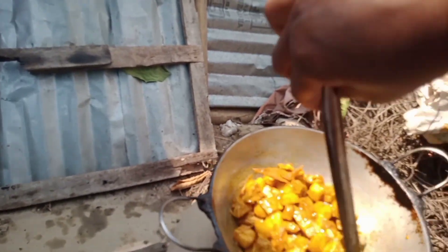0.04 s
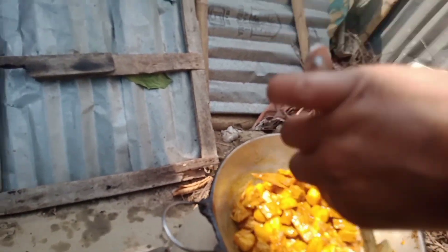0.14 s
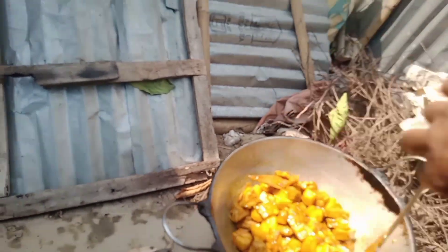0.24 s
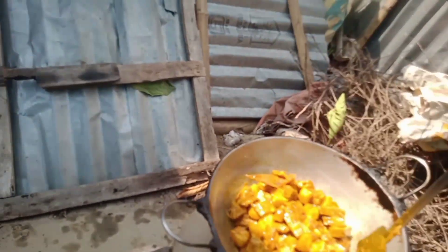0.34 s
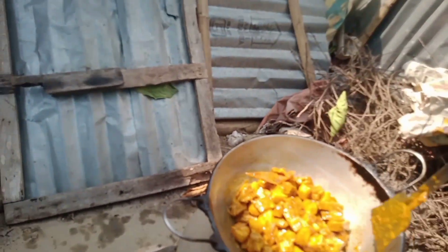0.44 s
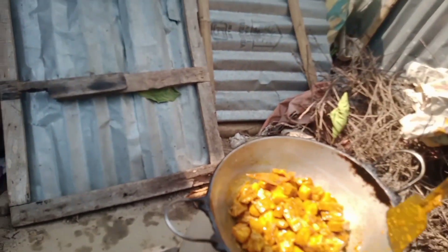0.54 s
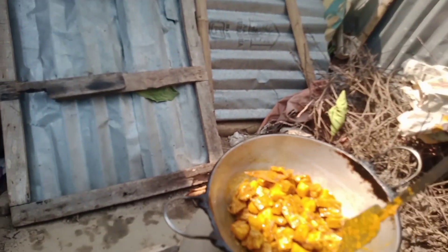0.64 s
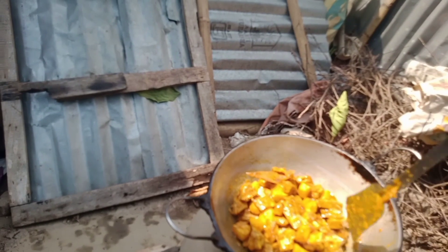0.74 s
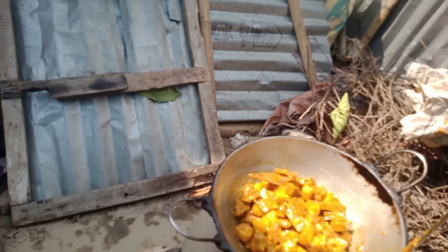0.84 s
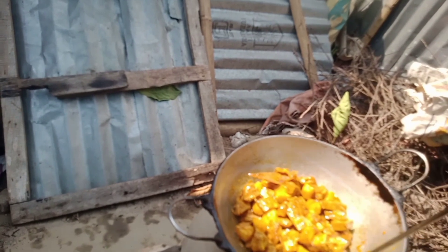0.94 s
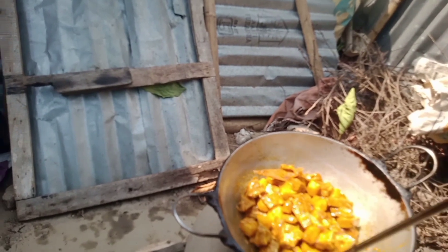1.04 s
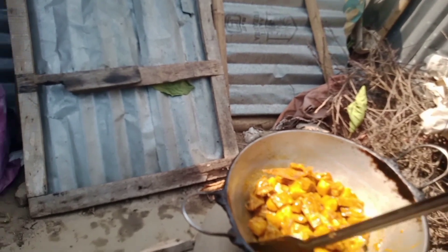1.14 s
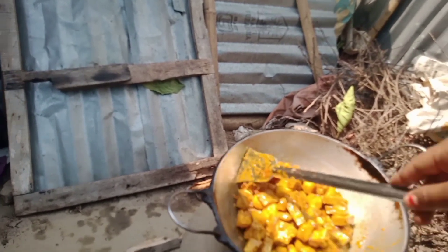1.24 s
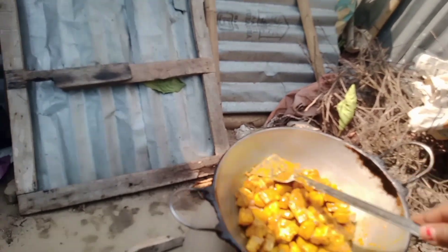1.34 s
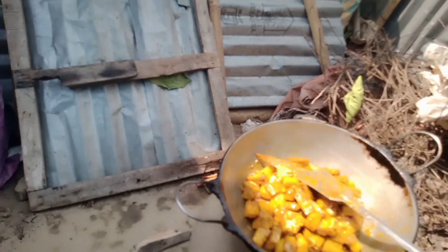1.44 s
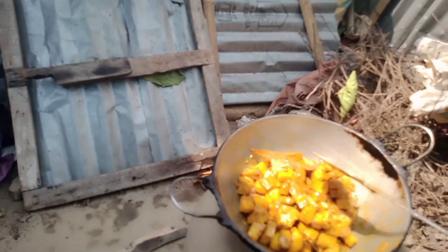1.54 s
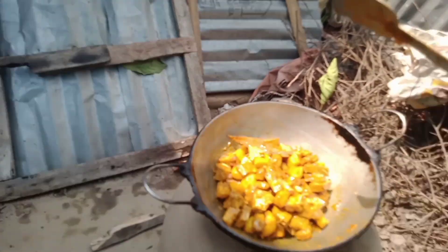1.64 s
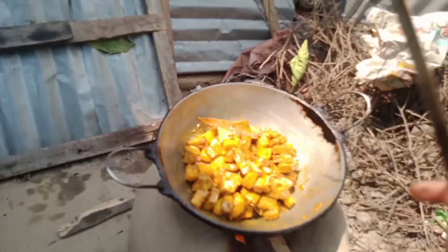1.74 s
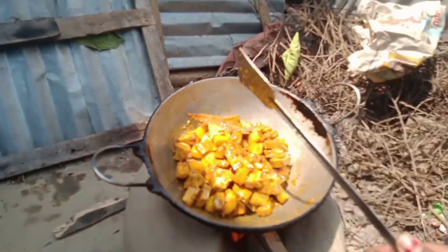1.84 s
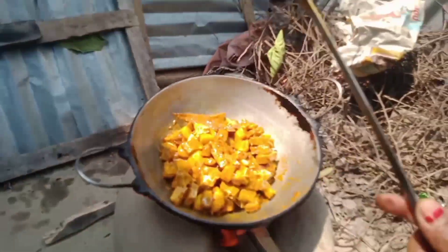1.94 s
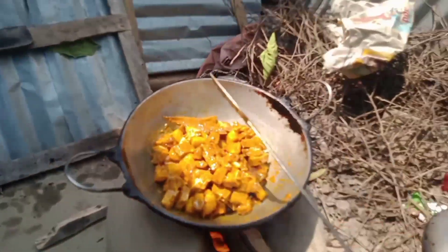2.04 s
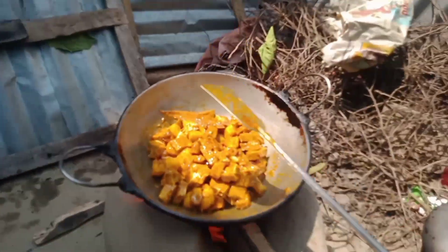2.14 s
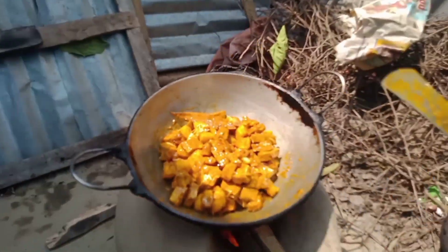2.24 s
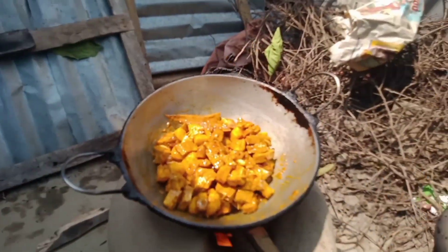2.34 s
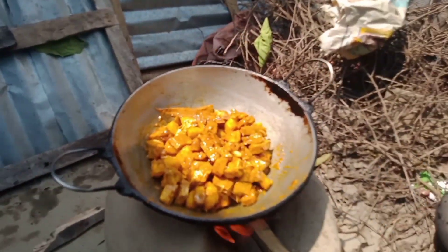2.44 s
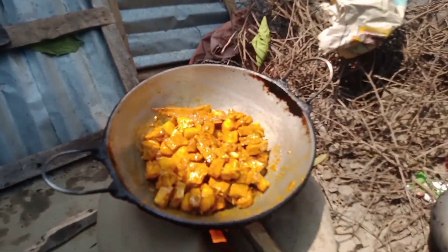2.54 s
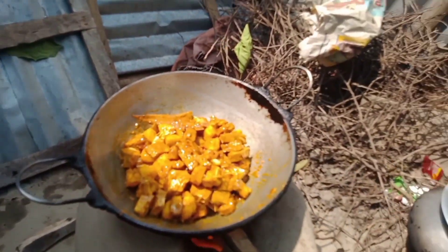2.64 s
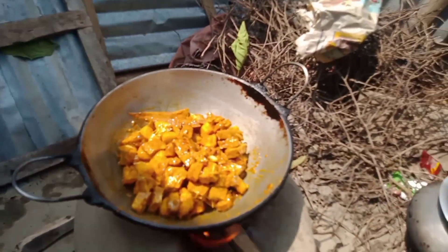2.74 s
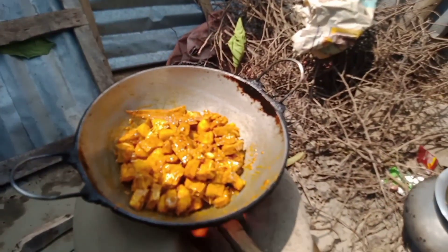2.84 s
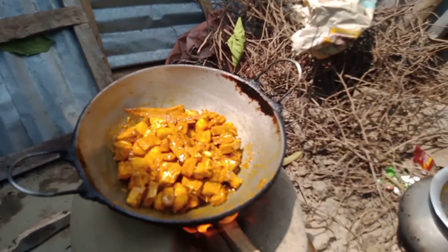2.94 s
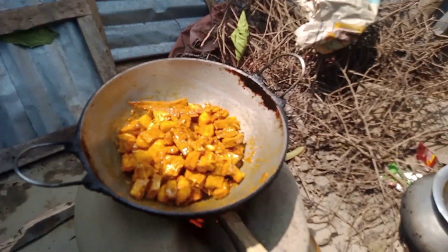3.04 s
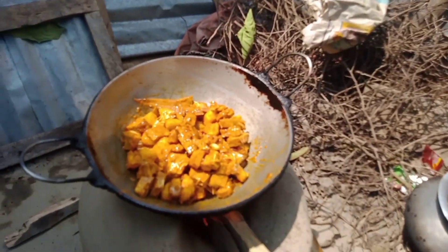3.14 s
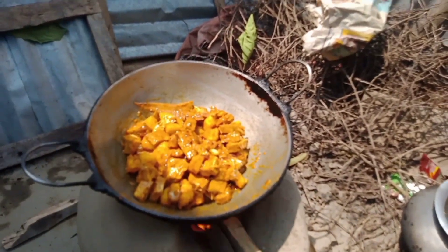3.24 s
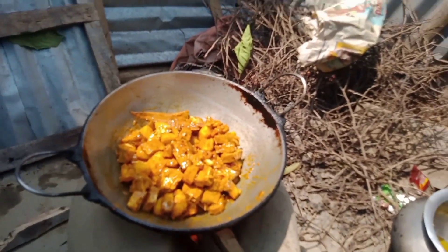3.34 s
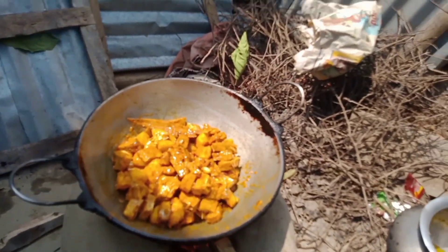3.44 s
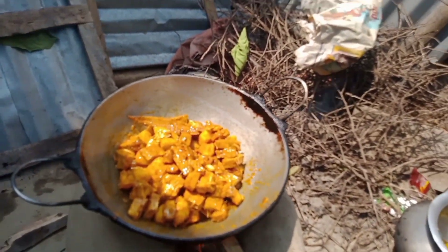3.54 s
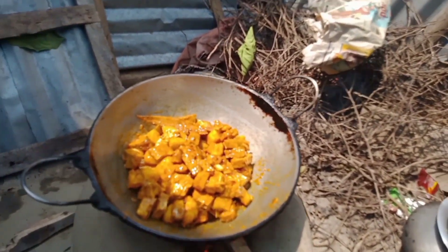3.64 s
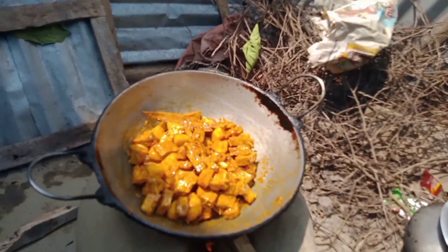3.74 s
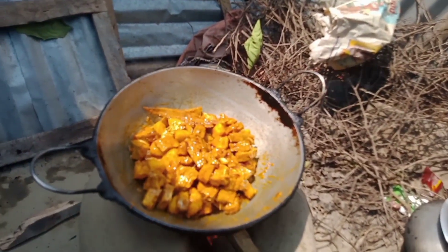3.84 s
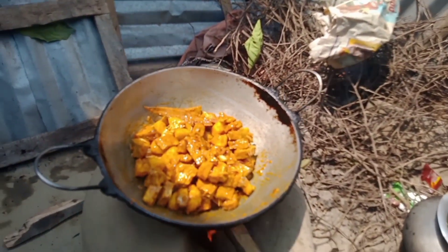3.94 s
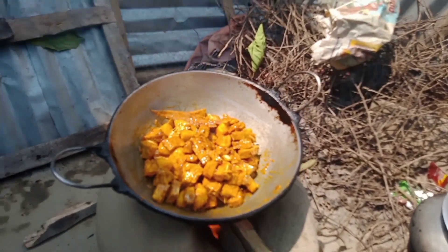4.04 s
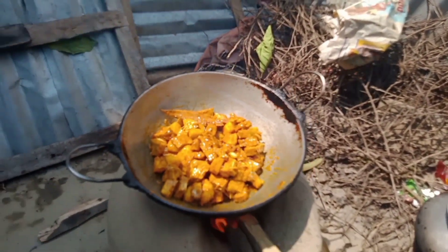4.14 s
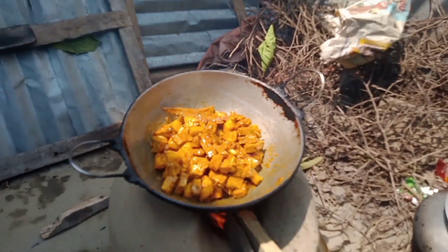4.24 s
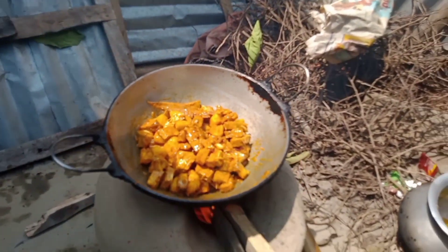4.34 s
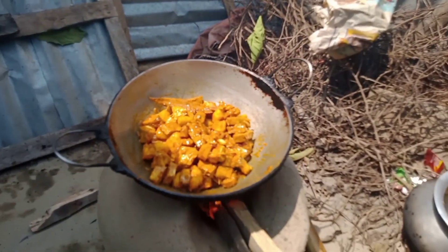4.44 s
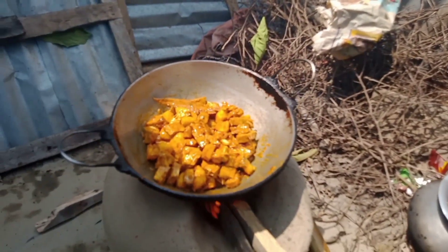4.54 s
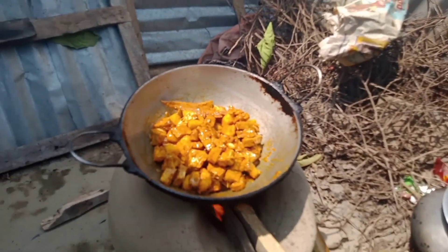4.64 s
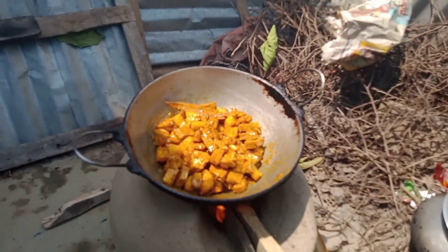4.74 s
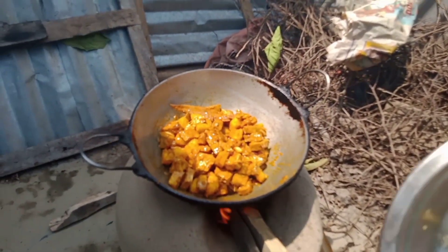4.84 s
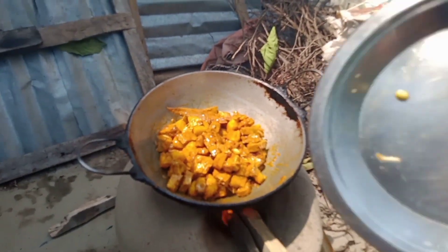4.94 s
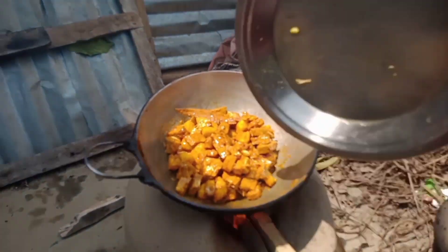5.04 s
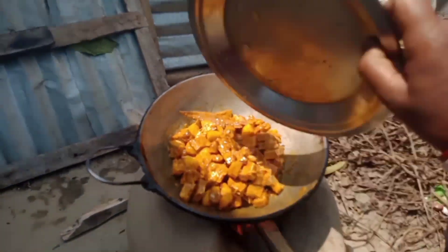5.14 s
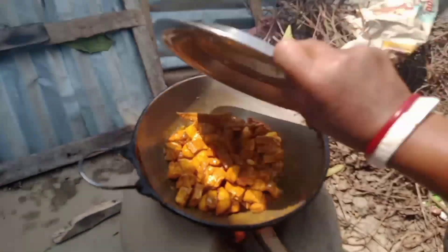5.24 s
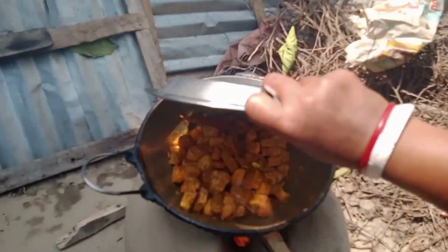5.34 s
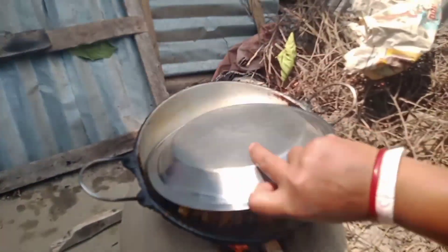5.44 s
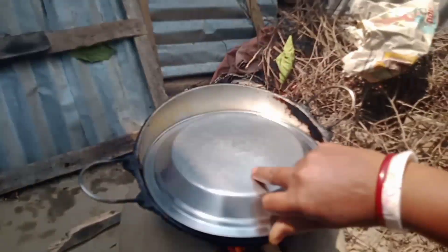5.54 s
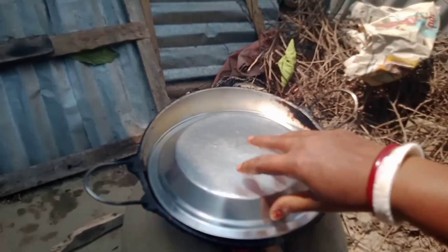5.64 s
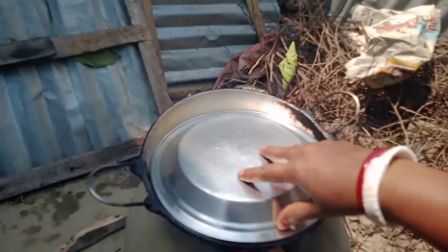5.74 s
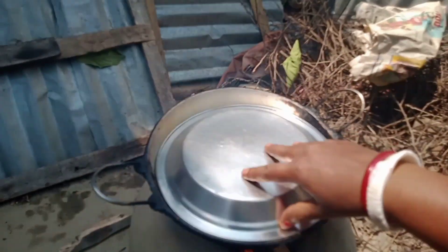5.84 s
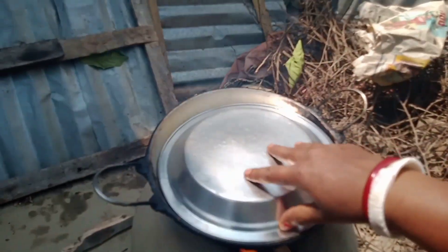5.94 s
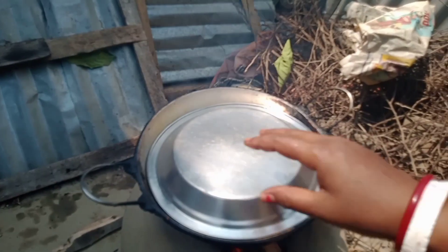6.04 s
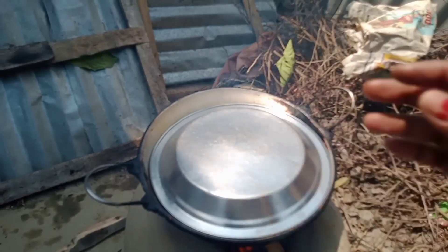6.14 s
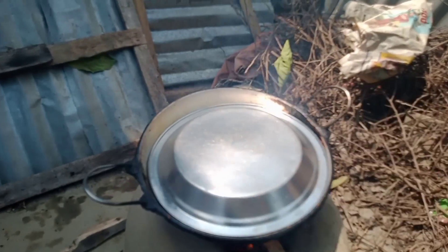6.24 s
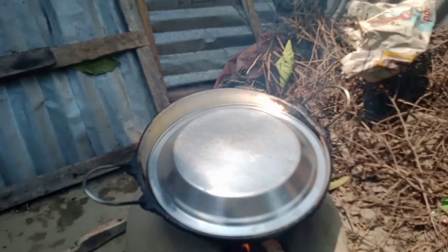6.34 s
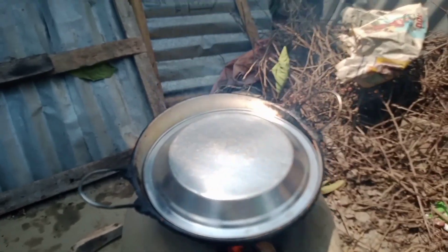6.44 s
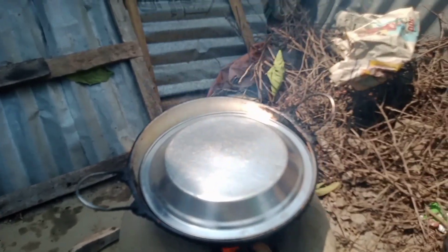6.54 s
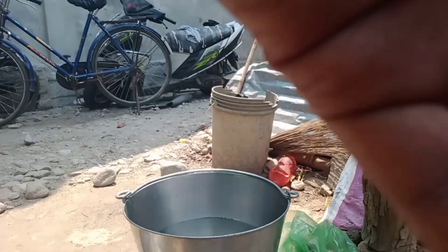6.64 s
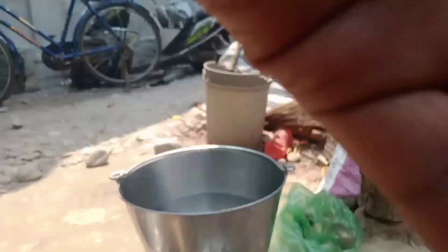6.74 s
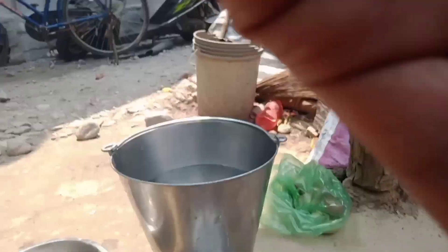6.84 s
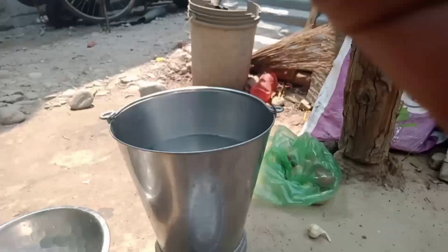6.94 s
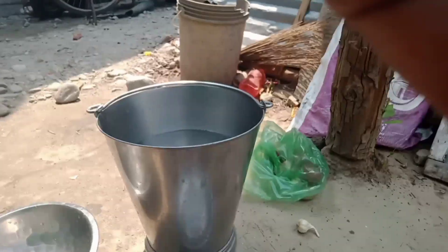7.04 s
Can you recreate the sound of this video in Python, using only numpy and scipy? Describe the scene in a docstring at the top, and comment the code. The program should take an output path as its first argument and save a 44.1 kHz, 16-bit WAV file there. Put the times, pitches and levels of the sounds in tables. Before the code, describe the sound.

Close, steady sizzling and bubbling come from vegetables frying in an outdoor wok. At first a metal spatula scrapes and taps the iron, with one sharper clang. After a few seconds of frying alone, a steel plate squeaks across the rim and rattles into place. The sizzle goes on, hollow under the lid, with a run of faint chirps. A moment of silence gives way to louder covered frying and light air rumble on the microphone.

```python
"""Sizzling of vegetables in oil, in a wok on a wood stove in a yard: water flashes to steam and pops. A metal
spatula scrapes, knocks and is put down. A steel plate rasps over the rim and drops on as a lid; the trapped air
turns the sizzle hollow, and a run of faint falling chirps is heard. Then the sound stops dead and the scene
changes: a louder covered wok fades in, with air rumbling on the microphone."""
import sys
import numpy as np
from scipy import signal
from scipy.fft import rfft, irfft
from scipy.io import wavfile

SR = 44100
rng = np.random.default_rng(int(sys.argv[2]) if len(sys.argv) > 2 else 0)


def master_out(mix):
    """Clip the mix to full scale and print it as 16-bit PCM to the path in sys.argv[1]."""
    frames = np.transpose(np.atleast_2d(mix))
    ceiling = np.clip(frames, -1, 1)
    pcm = np.round(ceiling * 32767).astype(np.int16)
    wavfile.write(sys.argv[1], SR, pcm)


N = 312669
TIME = np.arange(N) / SR
SILENCE_S = 6.675

# steel edge on iron: (frequency [Hz], relative density [dB])
EDGE_SPECTRUM = [(1500, -30), (3000, 6), (4100, 10.5), (5300, -1), (6600, -5), (7600, -11), (8500, -5.5),
                 (11000, -30.5), (15500, -22)]


def boiling_oil(snaps_per_s=11000, bubble_t60_cycles=6.3, pop_t60_cycles=36, pitch_count=24):
    """Water flashes to steam in oil: snaps, sputters, ringing bubbles and pops over a fine hiss."""
    snaps = grains(snaps_per_s, spread_db=3, cap=4.37)
    births = grains(per_s=2600, spread_db=2.5, cap=3.3)
    bursts = grains(per_s=110, spread_db=1.3, cap=4.3)
    pitch_index = rng.integers(0, pitch_count, N)
    bubbles, pops = np.zeros(N), np.zeros(N)
    for k, hz in enumerate(np.geomspace(650, 4400, pitch_count)):
        bubbles += hz * ring(births * (pitch_index == k), hz, bubble_t60_cycles / hz)
        pops += hz * ring(bursts * (pitch_index == k), hz, pop_t60_cycles / hz)
    sputters = crunch(np.abs(grains(per_s=130, spread_db=-3.5)), t60_s=0.01)
    hiss = from_db(-4) * rng.standard_normal(N)
    pitched = (at_level(bubbles, -1) + at_level(pops, -6.5)) / 2
    oil = snaps + at_level(sputters, -13) + hiss + pitched
    return oil * from_db(0.53 * drift(rate_hz=21))


def frying_levels_db(flare_rise_s=0.041, flare_fall_s=0.043, growth_db_per_s=0.3348):
    """Sizzle and bubbling follow the vigour; bubbling grows as the pieces shed water."""
    # vigour of the frying: (time [s], sizzle level [dB])
    vigour = [(0, -37), (0.28, -39.5), (0.35, -41.5), (0.9, -40.5), (1.25, -42), (1.62, -41), (1.88, -43),
              (2.46, -44), (2.6, -42), (3.1, -42.5), (3.9, -40.5), (4.5, -42), (5.0, -41.5), (5.08, -44),
              (5.2, -42.5), (5.35, -41)]
    # a wet face meets hot iron: (time [s], sizzle lift [dB], bubbling lift [dB])
    flares = [(.12, 1.6, 1.6), (.82, 0.5, -2), (1.14, 3.5, 4), (1.51, 3.5, 2), (2.76, 1.5, -1),
              (2.98, 0.5, 1.5), (3.9, 0.3, -0.5), (4.01, 1, -1.5), (4.8, 0.5, 0)]
    sizzle_db = curve(vigour)
    bubbling_db = -49 + 0.68 * (sizzle_db - sizzle_db.mean()) + growth_db_per_s * TIME
    bubbling_db += 1.04 * drift(rate_hz=5.2)   # small surges
    for s, sizzle_lift_db, bubbling_lift_db in flares:
        flare = np.exp(-((TIME - s) / np.where(TIME < s, flare_rise_s, flare_fall_s)) ** 2)
        sizzle_db += sizzle_lift_db * flare
        bubbling_db += bubbling_lift_db * flare
    return sizzle_db, bubbling_db


def open_wok(oil, crossover_hz=1450):
    """Open sizzle out of the bowl; near 1.7 s it dips around 1500 Hz and gains a little bass."""
    # open frying: (frequency [Hz], relative density [dB])
    early_spectrum = [(200, -28), (400, -14.5), (560, -12.5), (720, -4.5), (1020, -7), (1500, -3),
                      (2050, -0.5), (2600, -3.5), (3400, -2), (5000, -14.5), (7600, -26.5), (8700, -26),
                      (10500, -40), (15500, -38.5)]
    later_spectrum = [(60, -23), (220, -18), (480, -13.5), (680, -4.5), (1200, -5.5), (1540, -7),
                      (2050, -1.26), (2800, -4), (3400, -3), (5000, -14), (7600, -26), (8600, -24),
                      (10300, -38), (12500, -44), (15500, -39.5)]
    # bowl resonances: (frequency [Hz], width [Hz], lift [dB])
    bowl = [(670, 79, 2), (774, 60, 1.5), (991, 50, 3.5), (1256, 265, 4), (1748, 92, 3), (2150, 210, 1),
            (3330, 120, 0.6), (6700, 210, 3.5)]
    # loud spits of oil: (time [s], strength [dB])
    spit_events = [(.115, -17), (.790, -17), (.824, -18), (.927, -15), (1.135, -18), (1.4405, -19),
                   (1.458, -17), (1.512, -18), (2.090, -25), (2.810, -23), (3.107, -21), (3.180, -21),
                   (3.412, -19), (3.679, -18.5), (4.974, -22)]
    shift = np.interp(TIME, [1.5, 1.9], [0, 1])
    sound = (1 - shift) * colour(oil, early_spectrum) + shift * colour(oil, later_spectrum)
    sound = resonate(sound, bowl)
    bubbling = signal.sosfiltfilt(signal.butter(4, crossover_hz, fs=SR, output="sos"), sound)
    sizzle = sound - bubbling
    spit_clicks = impulses(spit_events)
    spray = from_db(-24) * crunch(spit_clicks, t60_s=0.0067)
    spits = butter(colour(spit_clicks + spray, early_spectrum), 9500, "low")
    sizzle_db, bubbling_db = frying_levels_db()
    return at_level(sizzle, sizzle_db) + at_level(bubbling, bubbling_db) + spits + droplets()


def lid_gap(frying, tilt_s=(5.42, 5.53)):
    """The gap under the tilted plate resonates; one peak climbs as it closes."""
    # gap resonances: (frequency [Hz], width [Hz], lift [dB])
    gap = [(524, 100, 12.5), (1150, 110, 2), (1680, 81, 8), (3430, 200, 2.5)]
    # climbing resonance: (time [s], frequency [Hz], lift [dB])
    closing = [(5.39, 1170, -2), (5.42, 1290, 9), (5.5, 1490, 3), (5.54, 1650, -1), (5.62, 1680, 0)]
    tilted = np.interp(TIME, tilt_s, [0, 1])
    sound = (1 - tilted) * frying + tilted * from_db(-1) * resonate(frying, gap)
    return glide(sound, closing, width_hz=88)


def covered_wok(oil, level_db, spectrum, cavity):
    """Air trapped under the plate resonates; level_db sets the band above 1400 Hz."""
    sound = resonate(colour(oil, spectrum), cavity)
    return from_db(level_db) * sound / rms(butter(sound, 1400, "high"))


def covered_simmer(oil):
    """Under the lid the hollow sizzle sinks, then builds."""
    # simmer: (time [s], level [dB])
    levels = [(5.77, -47.5), (5.87, -46.5), (6.05, -48), (6.3, -48), (6.42, -46), (6.66, -46)]
    # lidded frying: (frequency [Hz], relative density [dB])
    spectrum = [(120, -11), (330, 4), (520, -5.5), (850, -8), (1400, -9), (1950, -1.5), (2600, -7),
                (3500, -6), (5000, -13), (7600, -22.5), (8600, -21), (10300, -33), (12500, -40.5),
                (15500, -36)]
    # trapped air: (frequency [Hz], width [Hz], lift [dB])
    cavity = [(354, 75, 4.3), (1040, 88, 13), (1633, 78, 12.7), (2262, 51, 10), (2840, 184, 10.8),
              (3410, 130, 9), (4050, 120, 5.7), (4690, 100, 5), (5260, 150, 6), (5840, 79, 5.1),
              (6500, 100, 6.5)]
    return covered_wok(oil, curve(levels), spectrum, cavity)


def covered_loud(oil, level_db=-36, tone_hz=1067, tone_db=-44.5):
    """Louder covered frying; the strongest resonance sings as a wavering tone."""
    # loud lidded frying: (frequency [Hz], relative density [dB])
    spectrum = [(120, -14.5), (330, 2), (600, -12), (950, 4.5), (1480, -7), (2000, 0.5), (3100, 0),
                (4100, -5), (5300, -11.5), (7600, -21.5), (8700, -21), (10500, -34.5), (15500, -33)]
    # trapped air: (frequency [Hz], width [Hz], lift [dB])
    cavity = [(360, 48, 6.9), (1069, 31, 12.8), (1720, 64, 8.9), (2290, 79, 8.2), (2990, 180, 8.9),
              (3670, 140, 7), (4220, 150, 5.6), (6620, 150, 4)]
    tone = wavering_sine(tone_hz, depth=0.016, rate_hz=29.1)
    tone *= from_db(tone_db + 3.5 * drift(rate_hz=38))
    return covered_wok(oil, level_db, spectrum, cavity) + tone


def spatula():
    """Tiny slips of the blade hiss and ring wok and blade; knocks thud, clack, clang and tick."""
    # strokes over the iron: (start [s], length [s], wok level [dB], edge level [dB])
    strokes = [(-.03, 0.3, -54, -48.5), (.04, 0.097, -51.5, -55), (1.05, 0.1, -58.5, -56),
               (1.29, 0.14, -54, -53), (1.355, 0.037, -62, -50), (1.455, 0.11, -55, -52.5),
               (1.53, 0.13, -70.5, -52.5)]
    # knocks: (time [s], thud [dB], clang [dB], tick [dB])
    knocks = [(.676, -42.5, -44, -60), (.979, -42.5, -55.5, -42), (1.000, -47, -55, -57),
              (1.034, -50, -43, -59), (1.203, -47, -64, -64), (1.22, -46, -55, -59), (1.371, -82, -43, -49),
              (1.42, -78, -30.5, -57)]
    # light touches, one wall mode each: (time [s], strength [dB], frequency [Hz])
    touches = [(0.925, -30, 3470), (.985, -36, 1375), (1.033, -31.5, 1385), (1.074, -35, 1350),
               (1.366, -34, 2760), (1.616, -31, 2410)]
    # spatula laid aside: (time [s], strength [dB])
    set_down = [(2.940, -37), (2.982, -40.5), (2.997, -43)]
    # modes: (frequency [Hz], gain [dB], t60 [s])
    scraped_modes = [(452, 5, 0.1), (751, 2, 0.11), (1090, 8.5, 0.027), (1570, 4, .04), (2730, -11, 0.044)]
    seat_modes = [(235, -8.5, 0.08), (285, -4, 0.073), (384, -6, 0.12), (433, -4, 0.17)]   # wok on its seat
    wall_modes = [(1200, 0.5, 0.043), (1450, -16, 0.05), (1577, -2.5, 0.067), (2760, -9, 0.073)]
    blade_modes = [(5240, -8, 0.09), (6050, 1.5, 0.075), (7260, -6, 0.054), (8600, -5, .07),
                   (10300, -9, 0.027)]
    handle_modes = [(212, -20, 0.14), (268, -9, 0.06), (416, -8.5, 0.18), (640, -10, 0.052), (780, 2, 0.1),
                    (820, -21, .09), (1380, -9, 0.072), (1827, 3, 0.084)]

    wok_gain, edge_gain = (rubbing(strokes, column, attack_s=0.0059, release_s=0.021) for column in (2, 3))
    slips = grains(per_s=4000, spread_db=2)
    wok = strike(slips, scraped_modes)
    edge = colour(slips, EDGE_SPECTRUM) + at_level(strike(slips, blade_modes), -15)
    scrape = wok_gain * wok / rms(wok) + edge_gain * edge

    thuds, clangs, ticks = (impulses(knocks, column) for column in (1, 2, 3))
    aside = impulses(set_down)
    body = strike(thuds, seat_modes) + strike(aside, handle_modes)
    metal = strike(clangs, wall_modes) + from_db(-6) * strike(ticks, blade_modes)
    metal += sum(ring(click(s, db), hz, t60_s=0.035) for s, db, hz in touches)
    rings = butter(body, 216, "high") + butter(metal, 520, "high")   # the rings carry little bass
    clacks = from_db(-4.5) * thuds + from_db(-7.5) * aside
    return scrape + rings + spatula_contact(clacks, ticks)


def spatula_contact(clacks, ticks):
    """Impact noise: a dull clack and a shorter, bright tick."""
    # contact spectra: (frequency [Hz], relative density [dB])
    clack_spectrum = [(40, -40), (120, 0), (250, 12), (700, 18), (2000, 3), (4000, -32), (12000, -57)]
    tick_spectrum = [(2000, -15), (5000, 6), (6300, 10), (8000, 2), (10300, 1), (12000, -9), (16000, -11)]
    dull = colour(crunch(clacks, t60_s=0.12), clack_spectrum)
    bright = colour(crunch(ticks, t60_s=0.042), tick_spectrum)
    return dull + from_db(-2) * bright


def plate_slide(attack_s=0.0047):
    """The plate's rim catches on the wok, rasping and squealing."""
    # catches: (start [s], length [s], rasp [dB], squeal [dB])
    catches = [(5.438, 0.015, -35.5, -43), (5.462, 0.017, -33.5, -42), (5.472, 0.017, -48, -26.5)]
    # squeal partials: (frequency [Hz], gain [dB])
    partials = [(648, 1.5), (1190, -11), (1560, -12.5)]
    # rim friction: (frequency [Hz], relative density [dB])
    rasp_spectrum = [(50, -29), (200, -9.5), (400, -5.5), (620, 6), (850, -17.5), (1130, 0), (1380, -12),
                     (1700, -8), (4000, -18), (12000, -55)]
    rasp_gain = rubbing(catches, 2, attack_s, release_s=0.019)
    squeal_gain = rubbing(catches, 3, attack_s, release_s=0.0046)
    squeal = sum(from_db(db) * wavering_sine(hz, depth=0.012, rate_hz=65) for hz, db in partials)
    rasp = colour(grains(per_s=2400, spread_db=1), rasp_spectrum)
    return squeal_gain * squeal + rasp_gain * rasp


def plate_drop(dome_top_hz=700):
    """The plate drops and rocks: its dome booms, its rim clangs and clatters."""
    # impacts: (time [s], boom [dB], clang [dB], clatter [dB])
    landing = [(5.682, -36.5, -40, -32), (5.687, -54, -41, -39.5), (5.697, -36.5, -54, -31),
               (5.7072, -43.5, -33.5, -46), (5.72, -38.5, -39, -51), (5.742, -42.5, -45, -44),
               (5.902, -47.5, -42, -44)]
    # plate modes: (frequency [Hz], gain [dB], t60 [s])
    modes = [(195, -13, 0.75), (330, -8, 0.06), (350, -6, 0.14), (374, 3, 0.3), (396, -5.5, 0.18),
             (455, 7, 0.085), (535, -18, 0.04), (845, -11.5, 0.16), (1064, -6.5, 0.17), (1128, 1.5, 0.045),
             (1161, -4, 0.11), (2810, -18, 0.085), (3370, -13, 0.14)]
    # contact noise: (frequency [Hz], relative density [dB])
    clatter_spectrum = [(30, -36.5), (80, -16), (150, -22), (290, 1), (430, 6.5), (620, -1.5), (1150, -6.5),
                        (1350, -11), (1800, -3.5), (3000, -11), (6500, -23.5), (10000, -41), (16000, -55)]
    booms, clangs, contacts = (impulses(landing, column) for column in (1, 2, 3))
    dome = strike(booms, [mode for mode in modes if mode[0] < dome_top_hz])
    rim = strike(clangs, [mode for mode in modes if mode[0] >= dome_top_hz])
    rings = butter(dome + rim, 190, "high", order=2)   # the plate rings carry little bass
    ticks = from_db(-13) * colour(crunch(contacts, t60_s=0.018), EDGE_SPECTRUM)
    clatter = colour(crunch(contacts, t60_s=0.063), clatter_spectrum)
    return rings + ticks + clatter


def chirps(length_s=0.0195, end_hz=1306):
    """Short falling whistles: one alone, then a run of about eight a second."""
    # whistles: (time [s], level [dB], start frequency [Hz])
    whistles = [(4.027, -39, 2800), (5.828, -45, 2500), (5.938, -41, 2700), (6.059, -41.5, 2600),
                (6.184, -45, 2400), (6.291, -45, 2000), (6.526, -43, 1900), (6.630, -40, 1900)]
    out, n = np.zeros(N), round(length_s * SR)
    window = signal.windows.tukey(n, 0.7)
    for s, db, start_hz in whistles:
        at = round(s * SR)
        phase = 2 * np.pi * np.cumsum(np.geomspace(start_hz, end_hz, n)) / SR
        out[at:at + n] += from_db(db) * window * np.sin(phase)
    return out


def handling_thumps():
    """Soft bumps, each ringing one low mode."""
    # bumps: (time [s], level [dB], frequency [Hz], t60 [s])
    bumps = [(.773, -35, 109.4, 0.021), (4.316, -40.5, 135, 0.05), (4.318, -41, 190, 0.14),
             (6.968, -28.5, 128, 0.045)]
    return sum(ring(click(s, db), hz, t60_s) for s, db, hz, t60_s in bumps)


def rumble(gust_db=-50.5):
    """Fire and air rumble unsteadily; a gust joins at the end."""
    # fire and air: (time [s], level [dB])
    levels = [(0, -69.5), (0.7, -63.5), (1.7, -66), (2.05, -73), (2.6, -70), (3.7, -74), (4.8, -71.5),
              (5.3, -81), (5.9, -60.5), (6.6, -74)]
    # rumble spectra: (frequency [Hz], relative density [dB])
    air_spectrum = [(20, -21.5), (55, -2), (120, -2), (250, -10.5), (500, -2.5), (1500, -28.5), (8000, -48)]
    gust_spectrum = [(20, -12), (55, 0), (130, -2.5), (250, 0), (500, -5.5), (2000, -64)]
    air = from_db(curve(levels)) * colour(rng.standard_normal(N), air_spectrum)
    gust = from_db(gust_db) * colour(rng.standard_normal(N), gust_spectrum) * (TIME > SILENCE_S)
    return (air + gust) * from_db(3.1 * drift(rate_hz=32))


def droplets(level_db=-83, pitch_count=10):
    """Tiny drops burst on the hot wall with very short, high pings."""
    bursts = grains(per_s=220, spread_db=5.5, cap=3.6)
    pitch_index = rng.integers(0, pitch_count, N)
    pitches_hz = np.geomspace(8000, 15300, pitch_count)
    pings = sum(ring(bursts * (pitch_index == k), hz, t60_s=0.003) for k, hz in enumerate(pitches_hz))
    return at_level(pings, level_db)


def hand_shadow(frying):
    """A dip sweeps up the treble as a hand nears the microphone."""
    # dip: (time [s], frequency [Hz], lift [dB])
    path = [(6.43, 7240, 0), (6.48, 8600, -9), (6.515, 11690, -10), (6.59, 12900, -4), (6.675, 13200, -5),
            (6.72, 13200, 1)]
    return glide(frying, path, width_hz=2600)


def from_db(db):
    """Decibels to gain."""
    return 10 ** (np.asarray(db) / 20)


def rms(x):
    """Root mean square."""
    return np.sqrt(np.mean(x ** 2) + 1e-20)


def at_level(x, db):
    """Normalise to rms 1, then apply a gain."""
    return from_db(db) * x / rms(x)


def curve(points):
    """Straight lines through (time, value) points."""
    return np.interp(TIME, *np.transpose(points))


def butter(x, hz, kind, order=4):
    """Butterworth filter."""
    return signal.sosfilt(signal.butter(order, hz, kind, fs=SR, output="sos"), x)


def drift(rate_hz):
    """Slow random wander, rms about 1."""
    step, settle = 20, 2000
    r = np.exp(-2 * np.pi * rate_hz * step / SR)
    noise = rng.standard_normal(N // step + settle + 2)
    slow = signal.lfilter([1], [1, -2 * r, r * r], noise)[settle:]
    return np.interp(np.arange(N) / step, np.arange(len(slow)), slow / rms(slow))


def wavering_sine(hz, depth, rate_hz):
    """Sine with a wandering pitch."""
    return np.sin(2 * np.pi * np.cumsum(hz * (1 + depth * drift(rate_hz))) / SR)


def colour(x, spectrum, size=4096):
    """Minimum-phase filter of the given spectrum; white noise keeps its power."""
    hz, db = np.transpose(spectrum)
    bins_hz = np.arange(size // 2 + 1) * SR / size
    log_gain = np.log(from_db(np.interp(np.log(bins_hz + 1), np.log(hz), db)))
    cepstrum = irfft(log_gain)[:size // 2]
    response = irfft(np.exp(rfft(2 * cepstrum, size)))
    return signal.oaconvolve(x, response / np.linalg.norm(response))[:N]


def poles(r, hz):
    """Denominator of a resonator with pole radius r."""
    return [1, -2 * r * np.cos(2 * np.pi * hz / SR), r * r]


def resonate(x, peaks):
    """Each resonance lifts its own narrow band."""
    for hz, width_hz, lift_db in peaks:
        r = np.exp(-np.pi * width_hz / SR)
        band = signal.lfilter([1, 0, -1], poles(r, hz), x)
        x = x + (from_db(lift_db) - 1) * (1 - r * r) / 2 * band
    return x


def glide(x, path, width_hz, block=64):
    """A peak or dip whose frequency and lift follow a path."""
    s, hz, lift_db = np.transpose(path)
    r = np.exp(-np.pi * width_hz / SR)
    band, state = np.zeros(N), np.zeros(2)
    for i in range(int(s[0] * SR), int(s[-1] * SR), block):
        feedback = poles(r, np.interp(i / SR, s, hz))
        band[i:i + block], state = signal.lfilter([1, 0, -1], feedback, x[i:i + block], zi=state)
    return x + (from_db(np.interp(TIME, s, lift_db)) - 1) * (1 - r * r) / 2 * band


def ring(clicks, hz, t60_s):
    """A unit click starts a decaying sine of height 1."""
    r = from_db(-60 / (t60_s * SR))
    return signal.lfilter([0, np.sin(2 * np.pi * hz / SR)], poles(r, hz), clicks + 1e-18)


def strike(clicks, modes):
    """Clicks ring every given mode."""
    return sum(from_db(db) * ring(clicks, hz, t60_s) for hz, db, t60_s in modes)


def click(s, db):
    """One impulse."""
    out = np.zeros(N)
    out[round(s * SR)] = from_db(db)
    return out


def impulses(rows, db_column=1):
    """One click per row, at the time in column 0."""
    return sum(click(row[0], row[db_column]) for row in rows)


def crunch(clicks, t60_s):
    """Each click becomes a decaying noise burst."""
    envelope = signal.lfilter([1], [1, -from_db(-60 / (t60_s * SR))], clicks + 1e-18)
    return envelope * rng.standard_normal(N)


def grains(per_s, spread_db, cap=4.4):
    """Random clicks, levels exponentially spread up to cap times spread_db; rms 1."""
    sizes = from_db(spread_db * np.minimum(rng.exponential(1, N), cap))
    out = sizes * rng.choice([-1, 1], N) * (rng.random(N) < per_s / SR)
    return out / rms(out)


def rubbing(rows, db_column, attack_s, release_s):
    """Gain of gestures that rise, hold and die away; overlaps add in power."""
    power = np.zeros(N)
    for row in rows:
        start_s, length_s = row[:2]
        rise = np.clip((TIME - start_s) / attack_s, 0, 1)
        fall = np.exp(-np.clip((TIME - start_s - length_s) / release_s, 0, 40))
        power += (from_db(row[db_column]) * rise * fall) ** 2
    return np.sqrt(power)


def scene(shut_s=(5.515, 5.73)):
    """The sizzle is open, then escapes under the tilted plate, then is shut in."""
    oil = boiling_oil()
    shut = np.interp(TIME, shut_s, [0, 1])
    escaping = np.sqrt(1 - shut) * lid_gap(open_wok(oil))
    shut_in = np.sqrt(shut) * covered_simmer(boiling_oil())
    frying = np.where(TIME < SILENCE_S, escaping + shut_in, covered_loud(oil))
    utensils = spatula() + plate_slide() + plate_drop()
    return (hand_shadow(frying) + utensils + chirps() + handling_thumps() + rumble())[None]


def record(dry, low_cut_hz=50, high_cut_hz=15500, return_s=6.768, fade_s=0.12):
    """Deep bass and top are cut; the sound stops dead, then swells back in."""
    sound = butter(dry, low_cut_hz, "high", order=2)
    fade_in = np.clip((TIME - return_s) / fade_s, 0, 1) ** 3.1
    sound *= np.where(TIME < SILENCE_S, 1, fade_in)
    return signal.sosfilt(signal.ellip(12, 0.1, 80, high_cut_hz, fs=SR, output="sos"), sound)


dry = scene()
out = record(dry)
master_out(out)
```